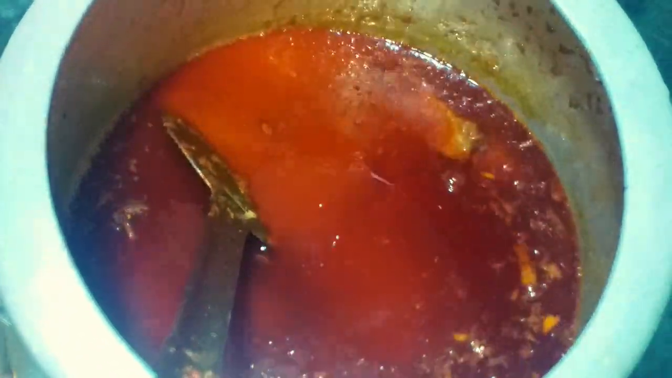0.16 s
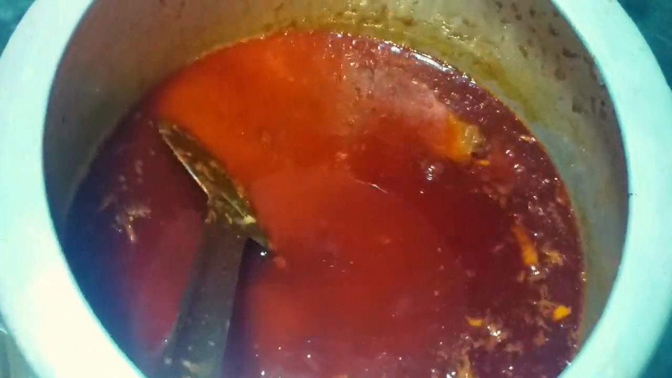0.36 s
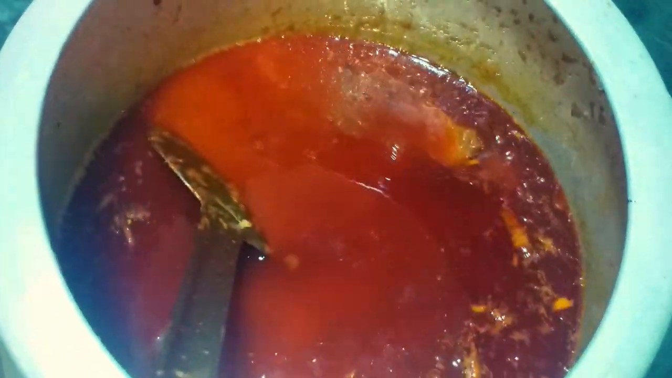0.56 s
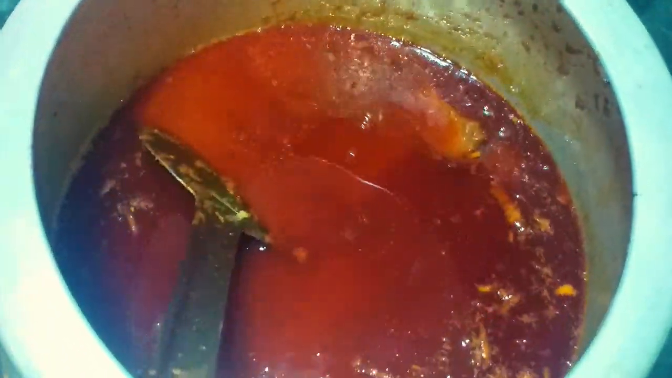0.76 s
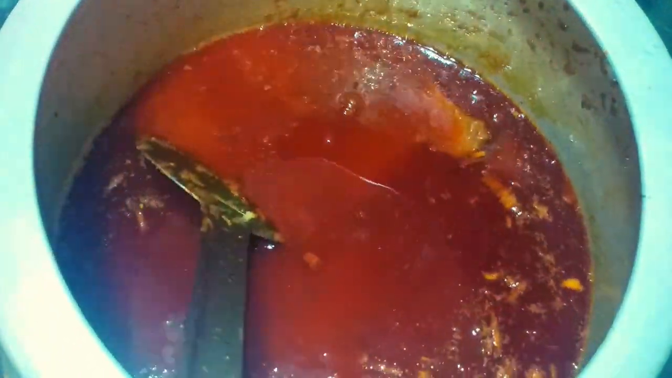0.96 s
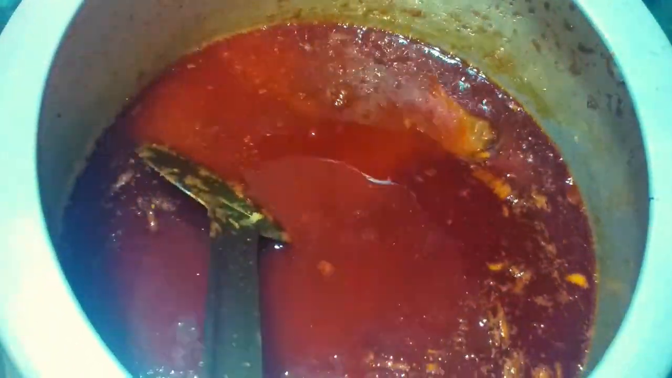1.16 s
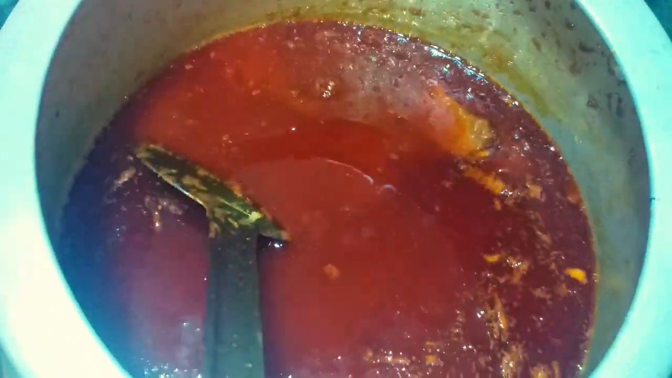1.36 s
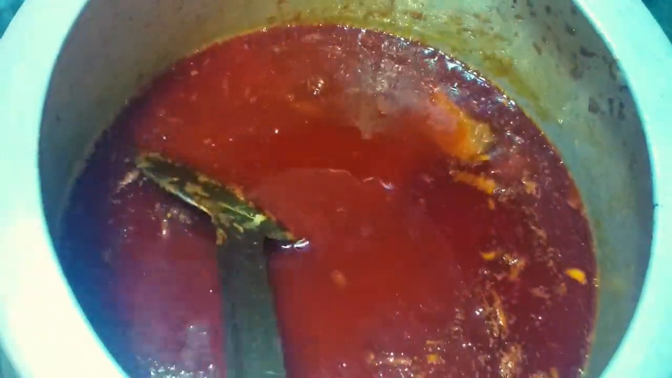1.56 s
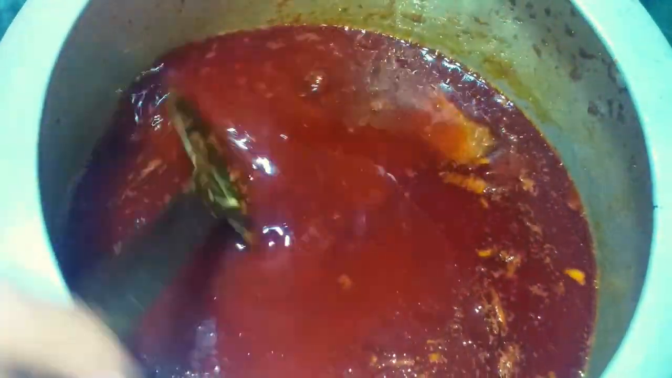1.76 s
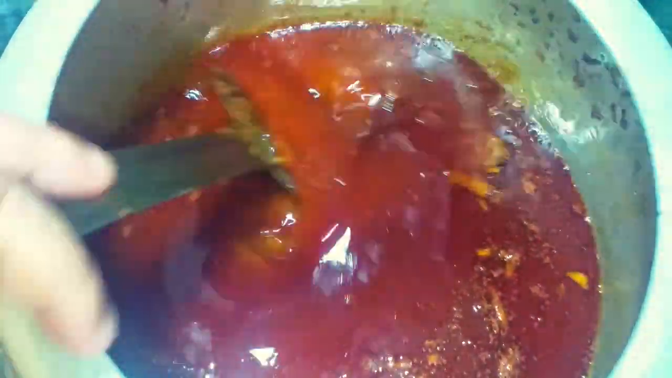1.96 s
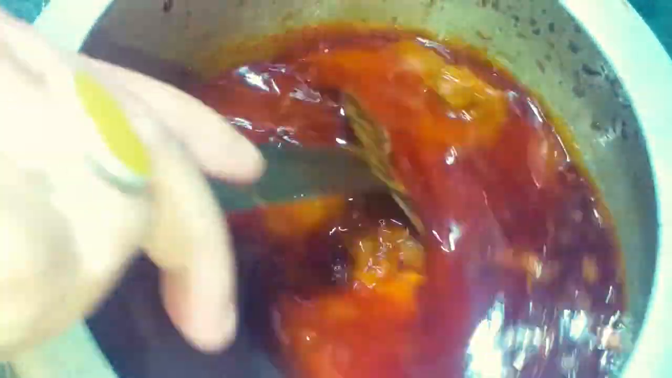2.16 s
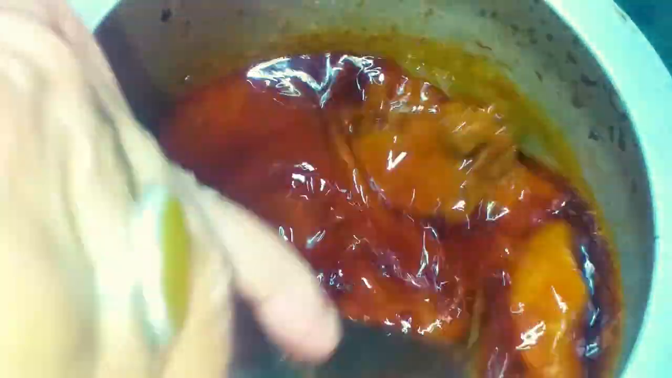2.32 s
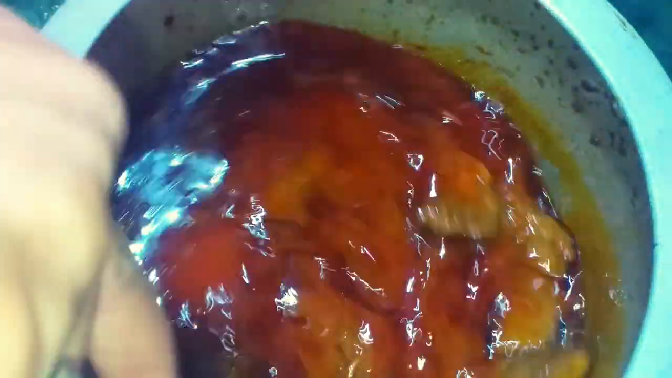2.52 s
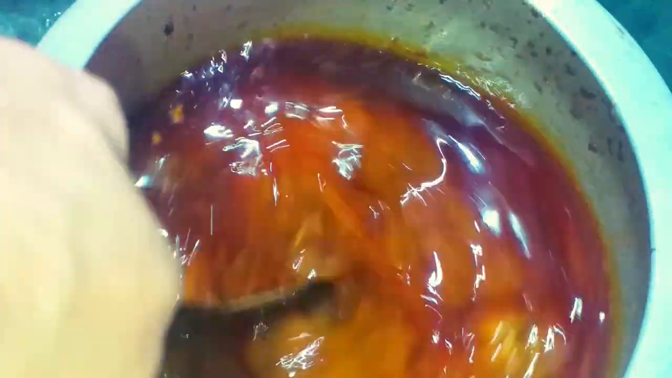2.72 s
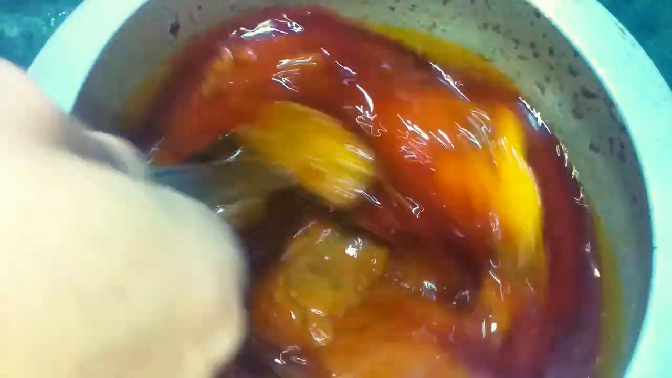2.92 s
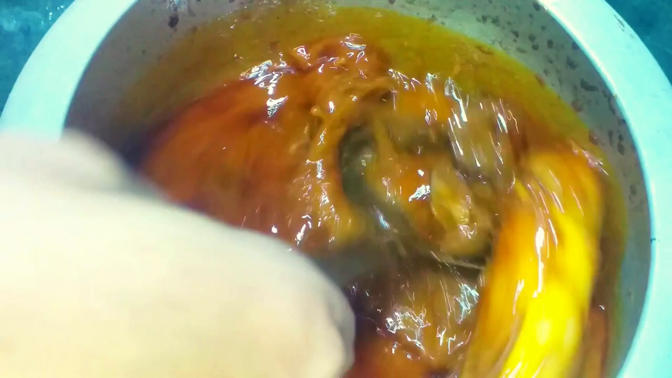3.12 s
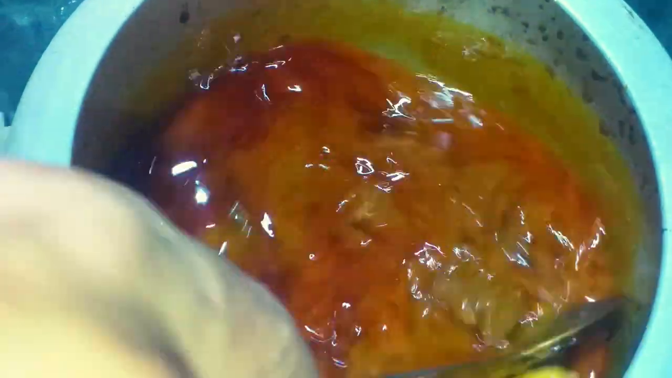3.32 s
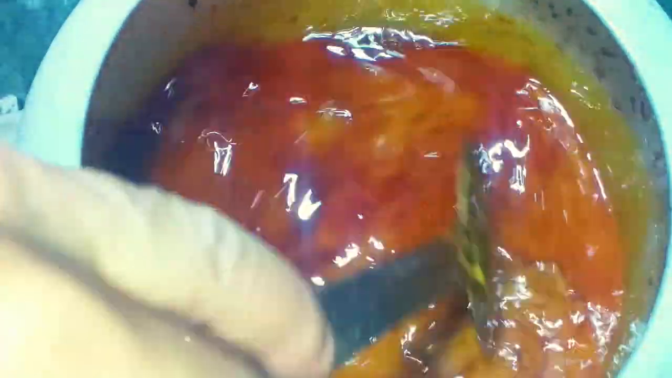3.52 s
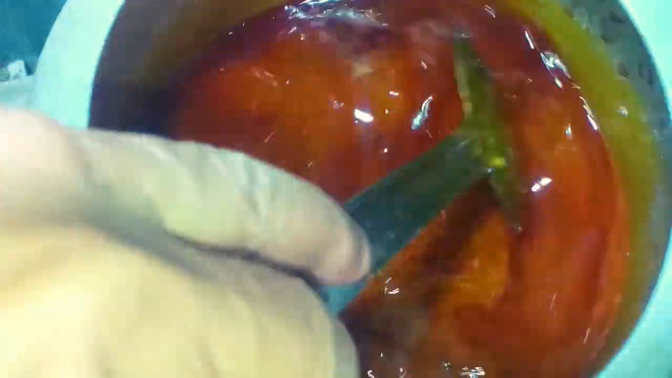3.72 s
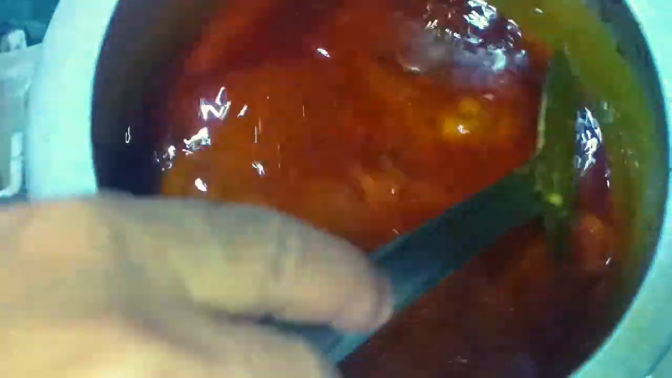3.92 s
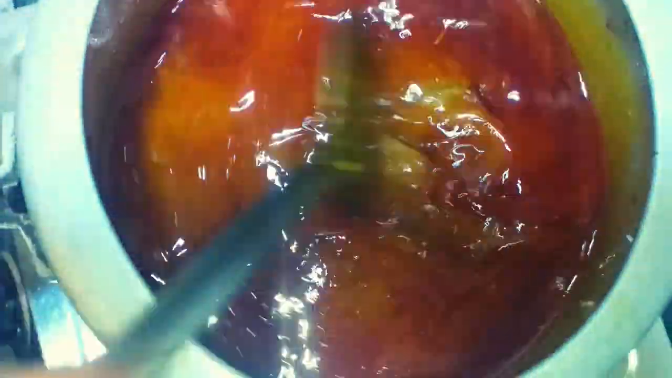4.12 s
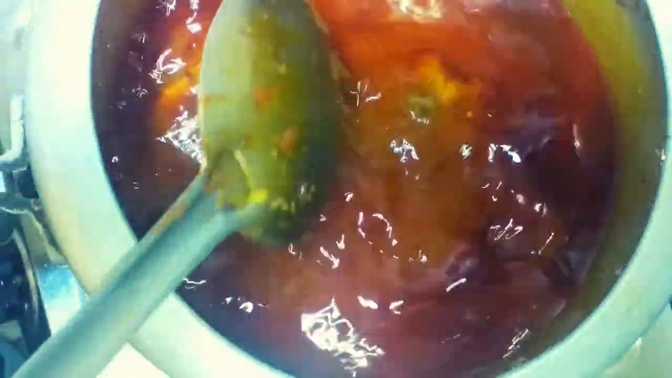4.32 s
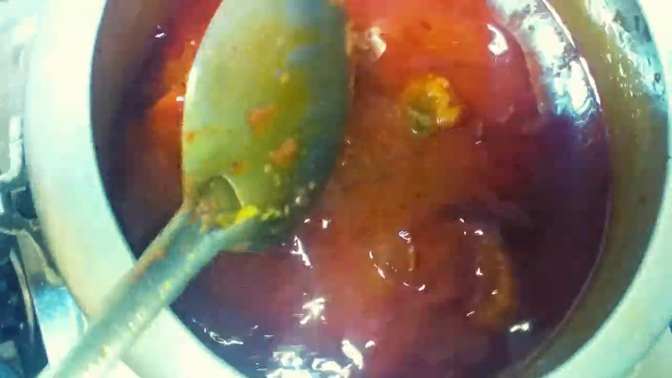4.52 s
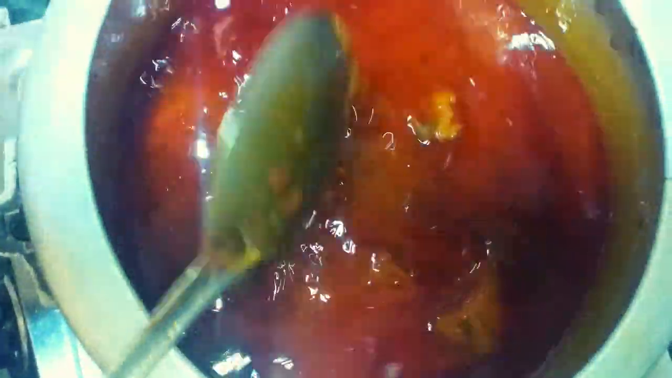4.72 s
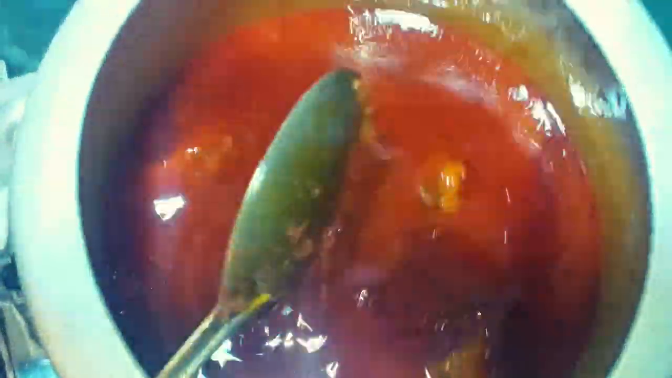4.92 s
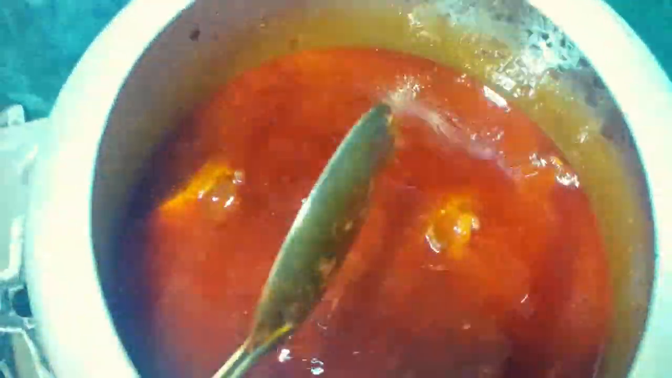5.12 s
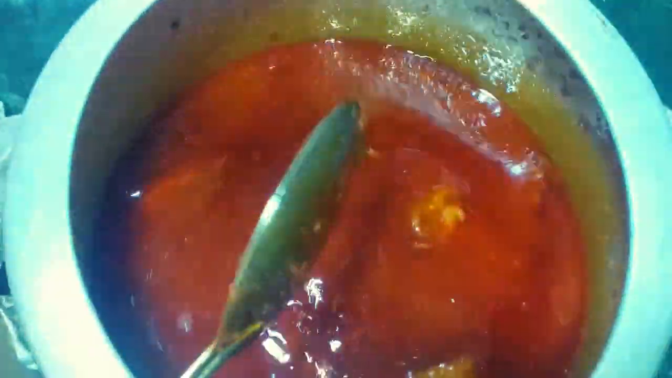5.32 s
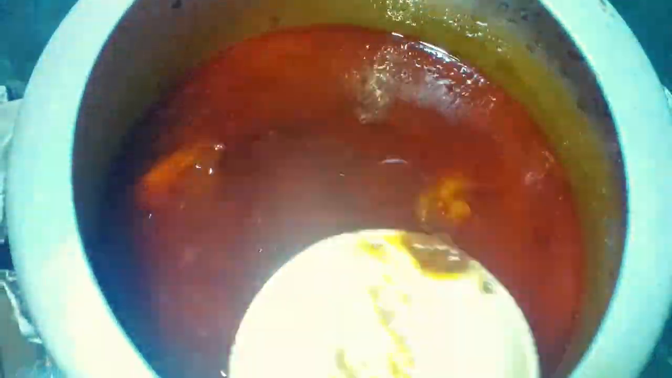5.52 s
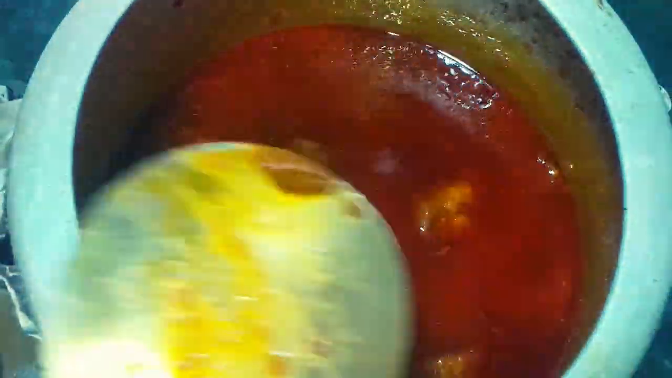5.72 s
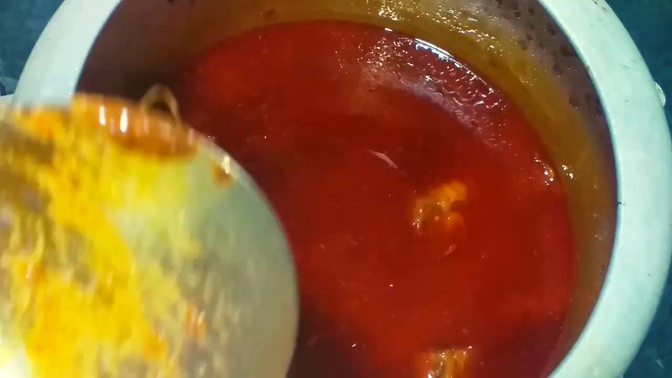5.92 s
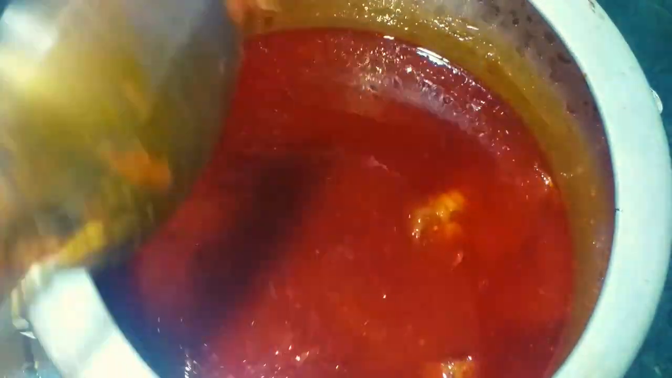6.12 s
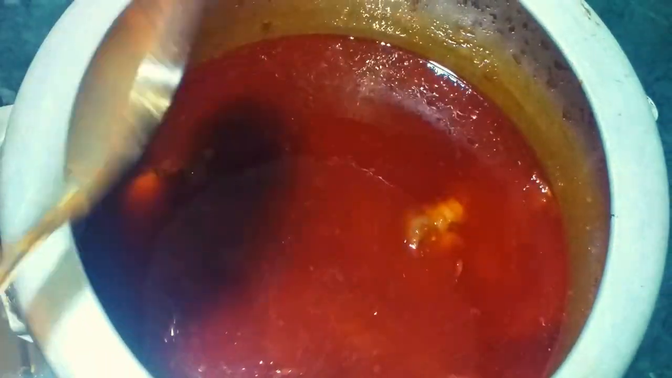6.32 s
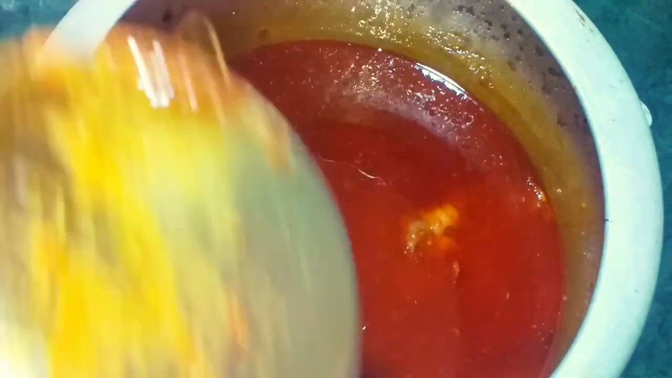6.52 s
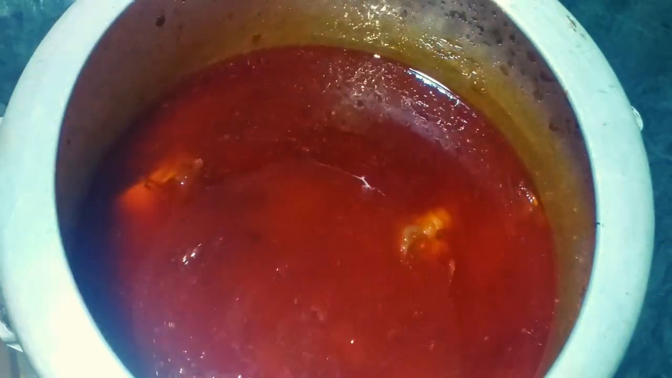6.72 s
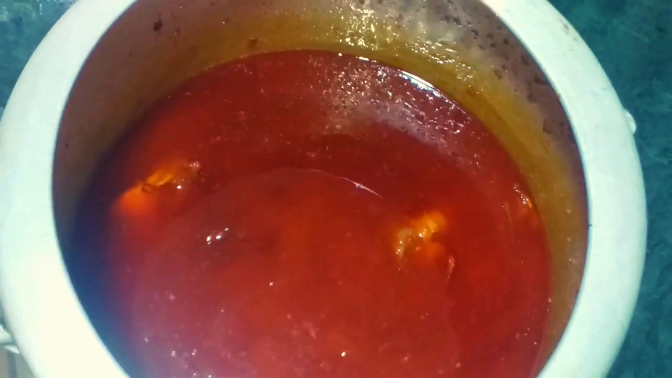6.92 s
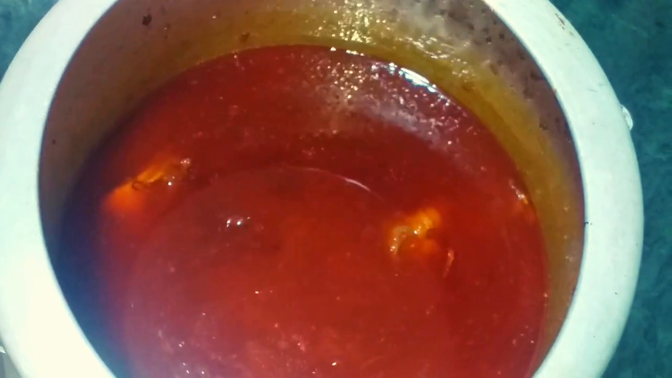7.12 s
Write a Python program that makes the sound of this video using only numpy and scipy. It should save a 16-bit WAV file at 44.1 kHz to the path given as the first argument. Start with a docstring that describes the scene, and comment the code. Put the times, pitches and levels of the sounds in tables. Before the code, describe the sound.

A pot of curry hisses softly over a low rumble in a small kitchen, heard very close. After a brushing slide and a soft double bump, a steel ladle knocks and scrapes the metal wall, with short squeals and gravy sloshing. A few drops plink, then six sharp, evenly spaced raps hit the rim. The ladle clinks lightly as it leaves, and the quiet simmer remains.

```python
"""A steel ladle stirs a simmering curry in an open pressure cooker, close to the microphone in a small kitchen.
It knocks (contact noise and ringing modes), scrapes (clumped tiny slips and squeaky chirps) and squeals (noise
through a resonance) while the gravy sloshes and drips as pitched bubbles; raps on the rim shake it clean, and it
clinks as it is taken away. The pot hisses with filtered noise and bursts over a low rumble with two wavering tones.
A brushing slide and a double bump on something hollow come early, and dull handling thumps stand apart."""
import sys
import numpy as np
from scipy import signal
from scipy.fft import rfft, irfft
from scipy.io import wavfile
from scipy.ndimage import uniform_filter1d, minimum_filter1d

SR = 44100
rng = np.random.default_rng(int(sys.argv[2]) if len(sys.argv) > 2 else 0)


def to_wav(sig):
    """Store sig (one row per channel, or 1-D mono) as 16-bit WAV at the path in sys.argv[1].

    Samples outside -1..1 are clipped; the rate is SR.
    """
    pcm = np.clip(np.atleast_2d(sig), -1, 1) * 32767
    pcm = np.round(pcm).astype(np.int16)
    wavfile.write(sys.argv[1], SR, pcm.T)  # frames by channels


N = 320607
TIME = np.arange(N) / SR  # seconds, whole scene
RING = np.arange(SR // 2) / SR  # seconds, one half-second sound

# modes of the filled pot: mode_hz [Hz], level_db [relative dB], t60_s [s]
POT_MODES = [(159.5, -10, 0.74), (290, -5, 0.37), (414, -2.5, 0.28), (489, 0, 0.16), (564, -2.5, .14),
             (669.5, 1, 0.21), (1178, -5.5, 0.27), (1555, -15.5, 0.14), (1764, 2.5, 0.23),
             (1850, 2.5, 0.19), (1983, 2, 0.25), (2020, -1, 0.31), (2450, 3, .2), (3160, 1, 0.21),
             (3640, -6, 0.13), (3900, 2.5, 0.097), (4155, 5.5, 0.12), (4360, 2, 0.093), (4860, 3.5, 0.081),
             (5280, -14, 0.14)]


def amp(db):
    """Decibels to gain."""
    return 10 ** (np.asarray(db) / 20)


def rms(x):
    """Root mean square."""
    return np.sqrt(np.mean(x ** 2) + 1e-20)


def evened(x):
    """Scales to rms 1."""
    return x / rms(x)


def attack(x, size=1100):
    """Scales a sound so that its opening samples, 25 ms by default, have rms 1."""
    return x / rms(x[:size])


def read(points, hz):
    """Reads a table on a log-frequency axis."""
    point_hz, value = np.transpose(points)
    return np.interp(np.log(hz + 1), np.log(point_hz + 1), value)


def level(rows):
    """Gain over time from a dB curve, dropping to -120 dB outside the rows."""
    s, db = np.transpose(rows)
    return amp(np.interp(TIME, s, db, left=-120, right=-120))


def held(length_s, rise_s, fall_s):
    """Linear attack, hold and exponential release."""
    rise = np.minimum(TIME / rise_s, 1)
    return rise * np.exp(-np.maximum(TIME - length_s, 0) / fall_s)


def drift(per_s):
    """Slow random wander of rms 1, with per_s random points a second."""
    knots = rng.standard_normal(int(TIME[-1] * per_s) + 2)
    return evened(np.interp(TIME * per_s, np.arange(len(knots)), knots))


def add(mix, start_s, sound):
    """Mixes a sound in at its start time."""
    part = mix[max(round(start_s * SR), 0):][:len(sound)]
    part += sound[:len(part)]


def coloured(x, points, size=4096):
    """Causal filter with the given spectrum."""
    log_gain = np.log(amp(read(points, abs(np.fft.fftfreq(size, 1 / SR)))))
    taps = np.fft.ifft(np.exp(np.conj(signal.hilbert(log_gain)))).real
    return signal.fftconvolve(x, taps[:size // 2])[:len(x)]


def rippled(x, depth_db, step_hz=130):
    """Every point of contact favours its own patches of the spectrum."""
    hz = np.arange(0, SR / 2, step_hz)
    ripple_db = depth_db * rng.standard_normal(len(hz))
    return coloured(x, np.column_stack([hz, ripple_db]))


def band_passed(x, low_hz, high_hz):
    """Keeps one band of the spectrum."""
    return signal.sosfilt(signal.butter(4, (low_hz, high_hz), "bandpass", fs=SR, output="sos"), x)


def ringing(modes, spread_db):
    """Dying sine modes; each point of contact favours them differently."""
    hz, db, t60_s = np.transpose(modes)[:, :, None]
    luck = rng.standard_normal(hz.shape)
    turn = rng.random(hz.shape)
    fade = np.exp(-np.log(1000) * RING / t60_s)
    tones = np.sin(2 * np.pi * (hz * RING + turn))
    return (amp(db + spread_db * luck) * fade * tones).sum(0)


def rising_ring(hz, cycles, rise):
    """A short resonance that dies within a few cycles' scale while its pitch rises."""
    age = RING[:6000] * hz / cycles
    swell = 1 - np.exp(-8 * age)
    rising_phase = 2 * np.pi * cycles * (age + rise * (age - 1 + np.exp(-age)))
    return np.exp(-age) * swell * np.sin(rising_phase)


def kitchen_tail():
    """Dense reflections, each band dying at its own speed."""
    # the kitchen's reverberation: band_hz [Hz], t60_s [s]
    kitchen = [(150, 0.091), (530, 0.37), (1400, 0.37), (4000, 0.31), (7000, 0.21), (14000, 0.26)]
    hz, t, z = signal.stft(rng.standard_normal(len(RING)), SR, nperseg=256)
    fade = np.exp(-np.log(1000) * t / read(kitchen, hz)[:, None])
    return signal.istft(z * fade, SR, nperseg=256)[1][:len(RING)]


def in_kitchen(x, wet_db):
    """A sound together with its reverberation."""
    tail = kitchen_tail()
    tail = tail / np.linalg.norm(tail)
    return x + amp(wet_db) * signal.fftconvolve(x, tail)[:len(x)]


def blows(rows, modes, colour, contact_hz, modes_db, tail_db, clatter_s, snap_s, snap_db, ripple_db, detune):
    """Each blow: a contact snap, a fast clatter of dense modes, ringing modes and the kitchen's tail."""
    # limits of the thud, wall, edge and fizz bands: edge_hz [Hz]
    band_edges = [120, 850, 3300, 8500, 16500]
    out = np.zeros(N)
    for start_s, bands_db, ring_db in rows:
        snap = (RING / snap_s) ** 2 * np.exp(-RING / snap_s) * np.sin(2 * np.pi * contact_hz * RING)
        snap = attack(coloured(snap, colour))

        clatter = rng.standard_normal(len(RING)) * np.exp(-RING / clatter_s)
        clatter = attack(rippled(coloured(clatter, colour), ripple_db))

        tail = kitchen_tail() * (1 - np.exp(-RING / 0.00095))
        tail = attack(rippled(coloured(tail, colour), 0.85 * ripple_db))

        # moving gravy and the grip of the hand shift the modes a little from blow to blow
        loaded = [(hz * (1 + detune * rng.uniform(-0.85, 1)), db, t60_s) for hz, db, t60_s in modes]
        ring = attack(coloured(ringing(loaded, spread_db=1), colour))

        blow = amp(snap_db) * snap + clatter
        blow += amp(tail_db + 0.64 * ring_db) * tail  # the tail partly follows the ring
        blow += amp(modes_db + ring_db) * ring
        # where and how hard the ladle lands sets the share of bottom thud, wall, edge and fizz
        for low_hz, high_hz, db in zip(band_edges, band_edges[1:], bands_db):
            add(out, start_s, amp(db) * attack(band_passed(blow, low_hz, high_hz)))
    return out


def stove():
    """Low rumble with a wavering hum, and the hiss of countless small bubbles bursting in the hot pot."""
    # spectrum of the rumble noise: band_hz [Hz], level_db [relative dB]
    rumble_colour = [(20, -22), (36, -27.5), (49, -10.5), (62, -6.5), (78, -3.5), (92, -5.5), (150, -13.5),
                     (230, -20), (500, -21), (1500, -32), (6000, -66)]
    # rumble over time: time_s [s], level_db [relative dB]
    rumble_curve = [(0.0, -57.5), (0.6, -55.5), (1.21, -59.5), (1.78, -54.5), (2.97, -65), (3.24, -63),
                    (3.77, -62), (4.27, -61.5), (4.46, -51.5), (5.73, -70), (6.48, -67.5), (6.84, -54.5),
                    (7.27, -57)]
    # low tones in the rumble: pitch_hz [Hz], level_db [mean dB against the rumble noise]
    hum = [(50, -13.5), (78, -5.5)]
    # spectrum of the hiss: band_hz [Hz], level_db [relative dB]
    hiss_colour = [(120, -27.5), (280, -6), (450, 1), (650, -4.5), (1300, -8), (2100, -5), (2900, -6.5),
                   (4300, 1), (5800, 0.5), (6900, -11.5), (8300, -37), (11000, -27.5), (15500, -28.5)]
    # hiss over time, livelier while the pot is stirred: time_s [s], level_db [dB]
    hiss_curve = [(0, -51.5), (.45, -61.5), (.85, -55.5), (1.35, -62.5), (2.0, -48.5), (2.5, -43),
                  (3.5, -47.5), (4.35, -45.5), (5.06, -58.5), (6.35, -59.5), (6.7, -54), (7.27, -53)]
    # treble of the hiss against its body: time_s [s], treble_db [dB]
    treble_curve = [(0, -2), (1.3, 4.5), (2, 0), (4.6, 0), (5.1, -10), (6.2, -10.5), (6.55, -5), (7.27, -5)]
    rumble_db, bursts_per_s, fizz_db, split_hz = 3.0, 700, -8, 4700

    spectrum = rfft(rng.standard_normal(N)) * amp(read(rumble_colour, np.fft.rfftfreq(N, 1 / SR)))
    rumble = evened(irfft(spectrum, N))
    for hz, db in hum:
        waver = amp(db + 2 * drift(per_s=9))
        rumble += waver * np.sqrt(2) * np.sin(2 * np.pi * hz * TIME + drift(per_s=4.5))

    bursts = (rng.random(N) < bursts_per_s / SR) * rng.standard_normal(N)
    steady = rng.standard_normal(N) * amp(0.49 * drift(per_s=21))
    hiss = evened(coloured(steady + amp(fizz_db) * evened(bursts), hiss_colour))
    treble = signal.sosfiltfilt(signal.butter(6, split_hz, "highpass", fs=SR, output="sos"), hiss)
    hiss = hiss - treble + level(treble_curve) * treble
    return amp(rumble_db) * level(rumble_curve) * evened(rumble) + level(hiss_curve) * hiss


def slide():
    """A soft rub with a hollow note in it, then a double bump that stirs the same note."""
    # the rub over time: time_s [s], level_db [dB]
    rub_curve = [(0.45, -55.5), (0.542, -30), (0.72, -63)]
    # spectrum of the rub: band_hz [Hz], level_db [relative dB]
    rub_colour = [(88, -59), (150, -25), (315, -10), (759, -33), (905, 5), (1020, -12.5), (1420, -18.5),
                  (1760, -1), (2180, -12), (3040, -4.5), (5570, -6.5), (8400, -38), (16000, -37)]
    # modes of the hollow thing: mode_hz [Hz], level_db [relative dB], t60_s [s]
    hollow_modes = [(822, 1, .2), (905, 0, .15), (1804, -14, .08), (1915, -12, .08)]
    # soft bumps: start_s [s], ring_db [dB]
    bumps = [(.889, -48), (.94, -50)]
    hollow_db, bump_decay_s, thud_db = -13, 0.011, -9

    rub = rng.standard_normal(N) * amp(1.4 * drift(per_s=90))
    hollow = ringing(hollow_modes, spread_db=0)
    note = signal.fftconvolve(rub, hollow)[:N]
    out = level(rub_curve) * (evened(coloured(rub, rub_colour)) + amp(hollow_db) * evened(note))
    for start_s, db in bumps:
        push = rng.standard_normal(len(RING)) * np.exp(-RING / bump_decay_s)
        thud = band_passed(push, 300, 2000)
        ring = attack(signal.fftconvolve(push, hollow), size=2200)
        add(out, start_s, amp(db) * ring)
        add(out, start_s, amp(db + thud_db) * attack(thud))
    return out


def thumps():
    """Soft low bumps that die within a few cycles."""
    # dull handling thumps: start_s [s], level_db [dB before the envelope], pitch_hz [Hz]
    thump_rows = [(.578, -32.5, 256), (5.005, -32.5, 156), (7.185, -38, 114)]
    envelope = RING / 0.0051 * np.exp(1 - RING / 0.0027)
    out = np.zeros(N)
    for start_s, db, hz in thump_rows:
        add(out, start_s, amp(db) * envelope * np.sin(2 * np.pi * hz * RING))
    return out


def squeals():
    """Uneven stick and slip drives one resonance of the metal into a short, rough squeal."""
    # a patch of the wall sings: start_s [s], length_s [s], level_db [dB before reverberation], pitch_hz [Hz]
    squeal_rows = [(1.233, 0.011, -34, 5530), (1.534, 0.035, -44, 1850), (1.803, 0.012, -18.5, 1852),
                   (1.826, 0.038, -30, 2000), (2.274, 0.0094, -22.5, 1580), (2.524, 0.15, -51, 1810),
                   (3.104, .08, -42.5, 1793)]
    width = 0.1  # width of each filter pass as a share of the pitch
    out = np.zeros(N)
    for start_s, length_s, db, hz in squeal_rows:
        b, a = signal.iirpeak(hz, 1 / width, fs=SR)
        once = signal.lfilter(b, a, rng.standard_normal(N))
        song = signal.lfilter(b, a, once)[-len(RING):]  # the settled end of the resonance
        song = attack(song, size=round(length_s * SR))
        envelope = held(length_s, rise_s=0.002, fall_s=0.006)[:len(RING)]
        add(out, start_s, amp(db) * song * envelope)
    return in_kitchen(out, wet_db=-7)


def clinks():
    """The ladle rings by itself, with hardly any sound from the pot."""
    # light touches: start_s [s], strength_db [dB], fizz_db [dB against the strength]
    touches = [(1.2335, -45, -27.5), (4.498, -37.5, -19), (6.0625, -29.5, -16.5), (6.189, -46.5, -26)]
    # modes of the ladle: mode_hz [Hz], level_db [relative dB], t60_s [s]
    ladle_modes = [(4100, -11.5, .23), (4350, 7, .12), (4700, 20.5, 0.1), (4980, 1, .25),
                   (5680, -17.5, .17), (5340, 20.5, 0.12), (5370, 11, 0.33), (6500, 6.5, 0.31),
                   (10400, -7.5, .22), (13430, 3, .25)]
    # spectrum of a clink: band_hz [Hz], level_db [relative dB]
    clink_colour = [(120, -28), (2500, -11.5), (3500, -4), (5200, -2), (6400, 1), (7600, -23.5),
                    (9000, -45), (13400, -21), (16000, -35.5)]
    thud_db, wall_db, edge_db, ring_db = -48, -27.5, 0, -3.5
    rows = []
    for start_s, db, fizz_db in touches:
        rows.append((start_s, db + np.array([thud_db, wall_db, edge_db, fizz_db]), ring_db))
    return blows(rows, ladle_modes, clink_colour, contact_hz=5200, modes_db=6, tail_db=0,
                 clatter_s=0.0041, snap_s=0.0004, snap_db=4, ripple_db=8, detune=0)


def knocks():
    """The depth at which the ladle strikes the pot sets the balance of thud, wall, edge and fizz."""
    # ladle against the pot: start_s [s], strength_db [dB], depth [0-1], ring_db [dB on the modes]
    strikes = [(1.37, -30.5, 0.11, -1), (1.4095, -33, 0.02, -5), (1.531, -19.5, 0.01, -4),
               (1.646, -27.5, 0.34, 3.5), (1.672, -30.5, 0.21, -15), (1.761, -33, .2, 4),
               (1.803, -20.5, 0.51, 2), (2.242, -33, 1, -1), (2.26, -27, 0.65, 5), (2.278, -23, 0.8, 1),
               (2.3008, -14.5, 0.64, -6.5), (2.5206, -27, 0.46, -11), (2.856, -36.5, 0.98, -4),
               (2.89, -34.5, 0.69, -13), (2.902, -25.5, 0.63, -9), (2.957, -44, 1, -27),
               (3, -24.5, 0.82, -9), (3.054, -40.5, 0.4, -20), (3.07, -37, 0.36, -9),
               (3.222, -39.5, 0.08, 0), (3.326, -39, 0, -11), (3.364, -37.5, 0, 4), (3.47, -33.5, 0.95, 0),
               (3.939, -46.5, 0.09, -3), (4.357, -42, 0.3, -23)]
    # the dry wall ticks, the wall under the gravy clangs, the bottom thuds:
    # depth [0-1], thud_db, wall_db, edge_db, fizz_db [dB against the strength]
    contact = [(0, -37, -21.5, 0, -12), (.15, -26, -27, 2, -25), (.5, -16.5, 2.5, 0, -20),
               (1, 1, -17, -8.5, -36)]
    # spectrum of a knock: band_hz [Hz], level_db [relative dB]
    knock_colour = [(71, -48), (120, -23.5), (278, -17.5), (445, -3.5), (727, -14.5), (930, -20),
                    (1190, -13.5), (1370, -17.5), (1980, -12), (2700, -15), (3820, -7), (5750, 1.5),
                    (8840, -37), (13600, -27), (16000, -40.5)]
    depths, *shares = np.transpose(contact)
    rows = []
    for start_s, db, depth, ring_db in strikes:
        bands_db = [db + np.interp(depth, depths, share) for share in shares]
        rows.append((start_s, bands_db, ring_db))
    return blows(rows, POT_MODES, knock_colour, contact_hz=4430, modes_db=-5.0, tail_db=-3.5,
                 clatter_s=0.0049, snap_s=0.00027, snap_db=-3.5, ripple_db=6.5, detune=0.0076)


def drips():
    """Single drops plink into the gravy, each a short ring of rising pitch."""
    # drops falling back: start_s [s], level_db [relative dB], pitch_hz [Hz at the start]
    drops = [(1.4686, -45.5, 2670), (1.524, -26.5, 997), (4.088, -29.5, 2200), (4.206, -29, 2880),
             (4.2304, -40, 1335), (4.2493, -31.5, 2610)]
    gain_db = -2
    out = np.zeros(N)
    for start_s, db, hz in drops:
        add(out, start_s, amp(db + gain_db) * rising_ring(hz, cycles=9.5, rise=0.15))
    return in_kitchen(out, wet_db=-6.0)


def slosh():
    """Thick gravy folds over the ladle in a crowd of short, dull bubbles; each rises in pitch near the surface."""
    # the moving gravy over time: time_s [s], level_db [relative dB]
    gravy_curve = [(1.52, -49.5), (1.74, -58), (1.88, -63.5), (2.2, -49), (2.34, -38.5), (2.65, -54),
                   (2.94, -48.5), (3.54, -63.5), (3.65, -85)]
    bubbles_per_s, gain_db = 9, 4  # the rate is for each pitch
    out = np.zeros(N)
    for hz in np.geomspace(310, 680, 16):
        size_db = 2.5 * np.minimum(rng.exponential(1, N), 3)
        pops = (rng.random(N) < bubbles_per_s / SR) * amp(size_db)
        out += signal.oaconvolve(pops, rising_ring(hz, cycles=4.3, rise=0.12))[:N]
    return amp(gain_db) * level(gravy_curve) * evened(in_kitchen(out, wet_db=-1.5))


def pressure():
    """How hard the ladle's edge bears on the wall: each stroke grips, eases off and lifts away."""
    # the edge dragged along the wall: start_s [s], length_s [s], level_db [relative dB at the grip]
    strokes = [(1.52, 0.16, -35), (1.76, 0.073, -27.5), (2.335, 0.41, -37.5), (3.073, 0.17, -38)]
    ease_db_per_s = -4.5
    out = np.zeros(N)
    for start_s, length_s, db in strokes:
        easing = amp(db + ease_db_per_s * TIME)
        add(out, start_s, easing * held(length_s, rise_s=0.008, fall_s=0.022))
    return out


def scrape():
    """Tiny slips of the ladle's edge come in clumps and ring the pot's wall, with tiny squeaky chirps among them."""
    # spectrum of the slips: band_hz [Hz], level_db [relative dB]
    scrape_colour = [(500, -34.5), (1000, -19), (1450, -10), (1850, -9), (2400, -13), (3000, 0.5),
                     (4200, 2), (6000, 3), (7300, -8), (8800, -36), (13500, -29)]
    slips_per_s, chirps_per_s = 900, 14  # chirps are for each pitch
    modes_db, chirps_db, gain_db = -5, -6, -1

    # the slow wander clumps the slips and the chirps alike
    size_db = 4.5 * np.minimum(rng.exponential(1, N), 3.5) + 3.5 * drift(per_s=45)
    clicks = (rng.random(N) < slips_per_s / SR) * rng.choice([-1, 1], N) * amp(size_db)
    slips = coloured(clicks, scrape_colour)
    wall = signal.fftconvolve(slips, ringing(POT_MODES, spread_db=3.0))[:N]
    chirps = np.zeros(N)
    for hz in np.geomspace(1300, 6500, 26):
        squeaks = (rng.random(N) < chirps_per_s / SR) * amp(size_db)
        chirps += signal.oaconvolve(squeaks, rising_ring(hz, cycles=22, rise=0.027))[:N]
    near = evened(in_kitchen(evened(slips) + amp(chirps_db) * evened(chirps), wet_db=-3.5))
    return amp(gain_db) * pressure() * evened(near + amp(modes_db) * evened(wall))


def raps():
    """Blows on the rim, each with a small rebound; the bite of the edge adds treble."""
    # raps and one last light touch: start_s [s], strength_db [dB], bite_db [dB on edge and fizz]
    rim_hits = [(4.397, -25.5, 0.5), (4.583, -25, -1), (4.738, -26.5, 1.5), (4.9158, -28, -1),
                (5.091, -27.5, -11), (5.267, -23, -2), (5.441, -53.5, -1)]
    # balance of a rap before its bite: thud_db, wall_db, edge_db, fizz_db [dB against the strength]
    rap_shares = [0, -1, 9, -8]
    # spectrum of a rap: band_hz [Hz], level_db [relative dB]
    rap_colour = [(100, -14.5), (250, -9), (520, -1), (880, -13.5), (1200, -0.5), (1550, -6), (2000, -4.5),
                  (3000, 1.5), (3350, -8), (3950, 6), (4300, 8.5), (5200, 7), (6400, 1.5), (7200, -16),
                  (8800, -37), (14000, -30)]
    ring_db, rebound_s, rebound_db = -2.5, 0.018, -16
    rows = []
    for start_s, db, bite_db in rim_hits:
        bands_db = db + np.array(rap_shares) + [0, 0, bite_db, bite_db]
        rows.append((start_s, bands_db, ring_db))
        rows.append((start_s + rebound_s, bands_db + rebound_db, ring_db))  # the ladle lands once more
    return blows(rows, POT_MODES, rap_colour, contact_hz=4460, modes_db=-1.5, tail_db=-2,
                 clatter_s=0.0069, snap_s=0.00015, snap_db=3.0, ripple_db=4.0, detune=0.003)


def scene():
    """All sources reach one microphone, heard alike in both ears."""
    ladle = knocks() + raps() + clinks() + scrape() + squeals()
    gravy = slosh() + drips()
    mono = ladle + gravy + thumps() + slide() + stove()
    return np.array([mono, mono])


def record(dry):
    """A fast limiter holds the hardest peaks at full scale; then a low-pass sets the band limit."""
    edge_hz = 15900
    allowed = 1 / np.maximum(abs(dry).max(0), 1)
    limited = dry * uniform_filter1d(minimum_filter1d(allowed, size=45), size=45)
    low_pass = signal.firwin(511, edge_hz, window=("kaiser", 9), fs=SR)
    return signal.oaconvolve(limited, low_pass[None], "same")


dry = scene()
out = record(dry)
to_wav(out)
```